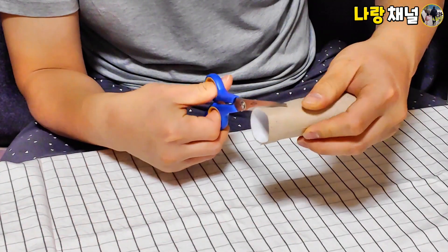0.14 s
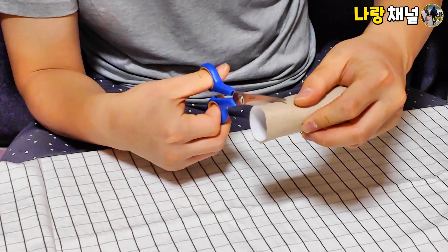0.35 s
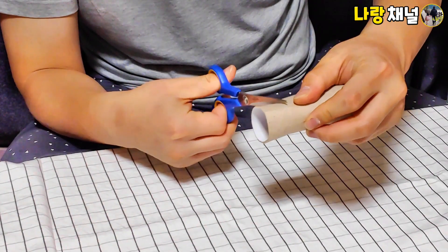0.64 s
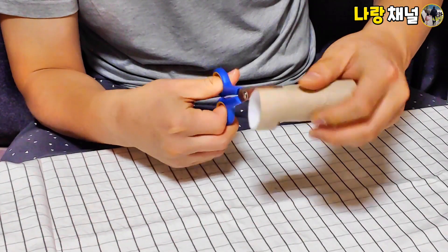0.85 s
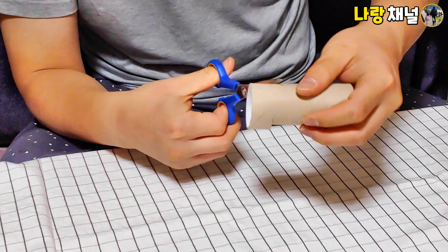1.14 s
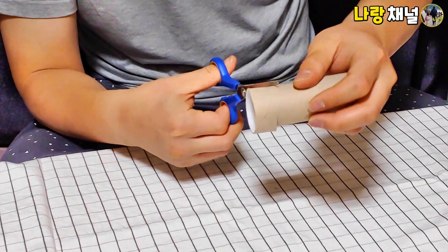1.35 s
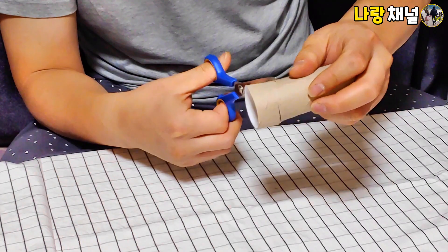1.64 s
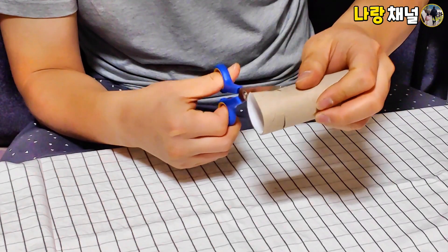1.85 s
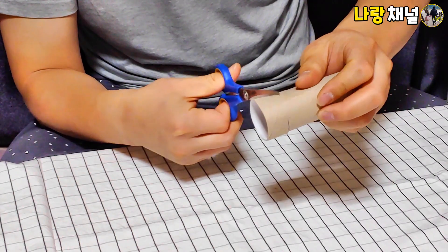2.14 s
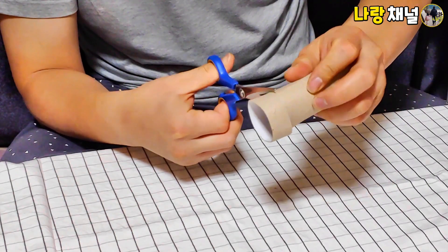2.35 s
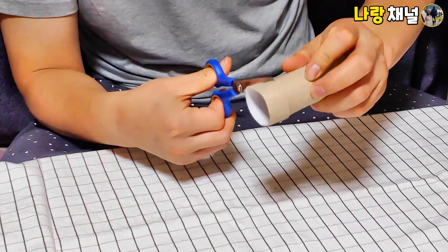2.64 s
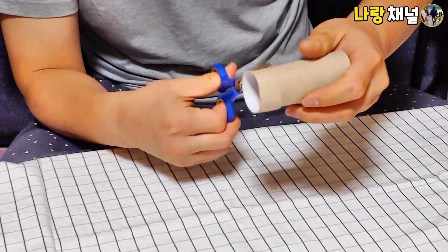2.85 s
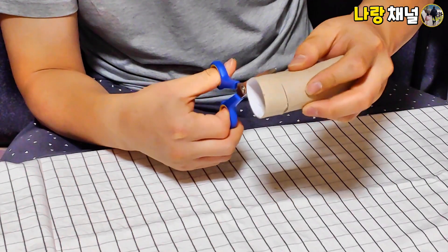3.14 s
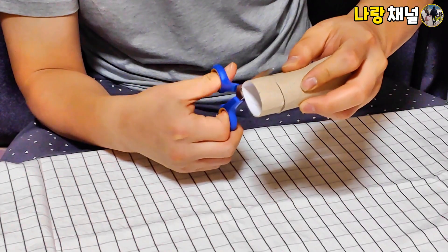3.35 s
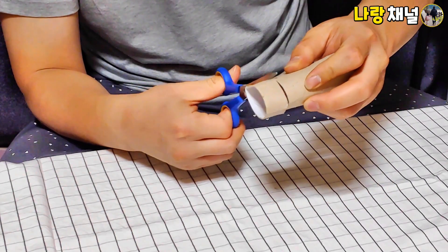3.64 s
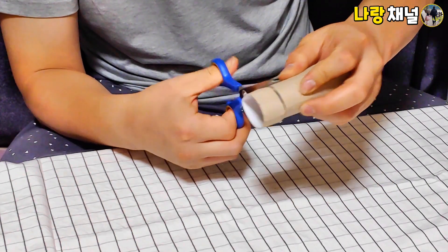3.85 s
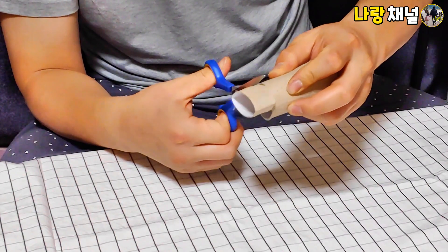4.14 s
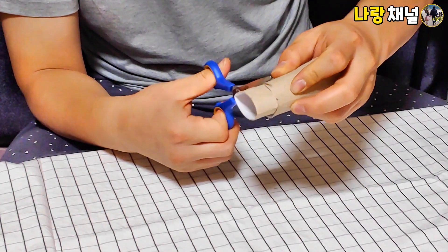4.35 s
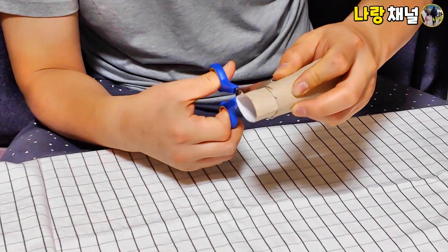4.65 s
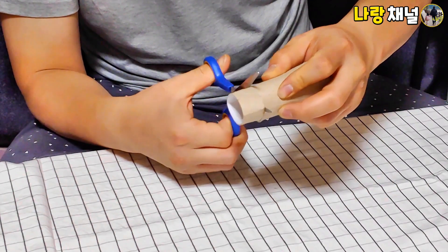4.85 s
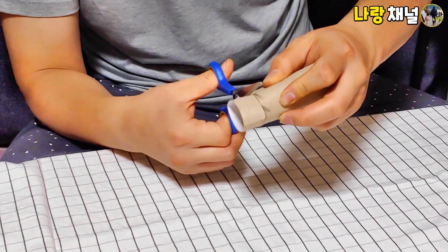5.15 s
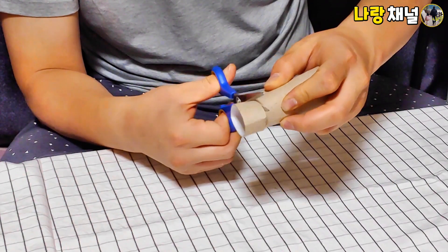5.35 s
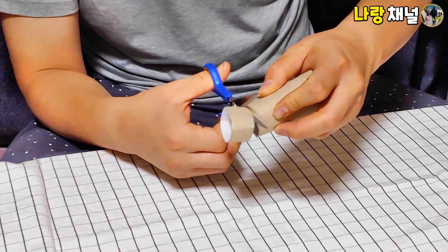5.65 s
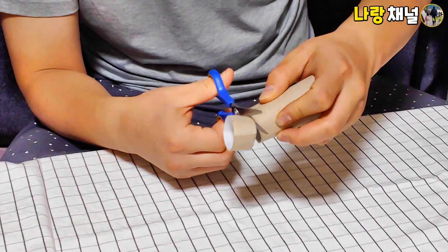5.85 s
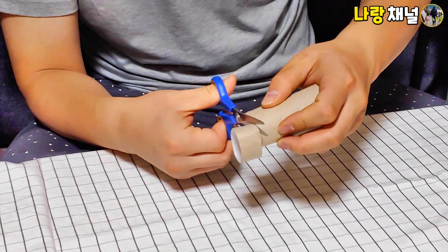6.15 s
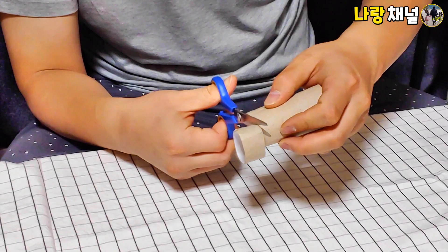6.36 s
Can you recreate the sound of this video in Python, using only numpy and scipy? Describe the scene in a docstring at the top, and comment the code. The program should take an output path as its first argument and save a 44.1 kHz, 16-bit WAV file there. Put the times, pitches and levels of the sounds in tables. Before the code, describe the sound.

Small scissors snip irregularly through a cardboard tube, crunchy papery cuts with hollow snaps, close up in a small quiet room.

```python
"""Small scissors snip round a cardboard tube held over a cloth-covered table in a small room.
From the start, stereo noise, a faint hum and a low rumble, stronger after 4 s, lie below filtered crackle:
the blades shear the card. Snaps soon ring card, fibres, tube air and steel; decaying noise is the room's reply.
Smooth pushes then make a round pop and dull thuds, and noise bursts short pitched rings and hisses; more follow.
Near the end a long noise burst through two low resonances gives a soft rustle."""
import sys
import numpy as np
from scipy import signal
from scipy.io import wavfile

SR = 44100
rng = np.random.default_rng(int(sys.argv[2]) if len(sys.argv) > 2 else 0)


def materialize(psi):
    """Save the field psi as 16-bit PCM at rate SR to the path in sys.argv[1].

    A 1-D psi becomes a single channel; in a 2-D psi each row is a channel.
    """
    bounded = np.clip(np.atleast_2d(psi).T, -1, 1)
    quanta = np.round(bounded * 32767).astype(np.int16)
    wavfile.write(sys.argv[1], SR, quanta)


N = 286648

# Background noise density: f/Hz, relative level/dB per Hz
AIR_SPECTRUM = [(15, -31), (25, -1.5), (64, 3), (242, -6.5), (301, -7), (363, -5.5), (463, -10),
                (1020, -14), (1440, -19.5), (2480, -24.5), (6560, -31), (11600, -40), (16000, -36)]
# Left-right likeness of that noise: f/Hz, correlation/1
AIR_LIKENESS = [(60, 0.42), (250, 0.41), (700, 0.11)]
# Course of the low rumble before its flutter: t/s, level/dB
RUMBLE_COURSE = [(2.9, -78.5), (3.5, -69), (4.03, -67), (4.18, -54.5), (4.41, -49.5), (4.82, -71),
                 (4.91, -52), (4.96, -49), (5.04, -67), (5.14, -48.5), (5.28, -72), (5.9, -59), (5.97, -72),
                 (6.03, -53.5), (6.39, -72), (6.5, -68)]
# Strokes of the blades through and along the card: full force t/s, rise/s, hold/s, tube wall level/dB;
# then re wall: hollow part/dB, air column/dB, low hiss/dB, high hiss/dB, sharp edge of the tearing/dB
STROKES = [(0.0, 0.0088, 0.058, -63.5, 7.5, -2, 5, 6.5, 14),
           (0.11, 0.025, 0.0049, -34.5, -5.5, 2, -35, -20, -6),
           (0.386, 0.03, 0.0066, -39.5, 3.5, 6, -7, -8, 7),
           (0.697, 0.052, 0.068, -55, 4.5, 4.5, -6, -6, -5),
           (0.805, 0.043, 0.026, -47.5, 11, 6.5, 9, 1.5, -3), (0.9, 0.19, 0.036, -48.5, -8, -7, -18, -4, 1),
           (1.049, 0.091, 0.022, -50, -0.5, -15, -10, -4, 1),
           (1.147, 0.088, 0.011, -35.5, -0.5, -5.5, -9, -9.5, -3.5),
           (1.26, 0.11, 0.031, -54, -10, -16, -5.5, -8.5, -4),
           (1.47, 0.082, 0.045, -49.5, -4.5, -2.5, -15, -19, -29),
           (1.706, 0.057, 0.059, -47, -2.5, -3.5, -12.5, -12.5, -13),
           (1.929, 0.19, 0.011, -60.5, -4, -12, -6, -5.5, -6),
           (2.115, 0.025, 0.018, -31.5, -1, 3.5, -18.5, -18.5, 5.5),
           (2.326, 0.057, 0.036, -34, -3, -8, -12, -13.5, -1.5),
           (2.43, 0.03, 0.0085, -45, -10, -21, -14, -14, -5),
           (2.505, 0.034, 0.004, -36, -1.5, -6.5, -15, -15.5, -2),
           (2.772, 0.039, 0.058, -40.5, -7.5, -2.5, -12.5, -13, 1),
           (2.922, 0.093, 0.028, -46.5, -8, -19, -10, -10, -13),
           (2.99, 0.099, 0.027, -53, 5, 5.5, 0.5, 0.5, 11),
           (3.097, 0.1, 0.0082, -36, 0, -1.5, -11.5, -12, -8.5),
           (3.19, 0.073, 0.019, -42, 2, 2.5, -6.5, -8, -1),
           (3.302, 0.032, 0.0039, -42, -9.5, -3.5, -5.5, -7, 2),
           (3.439, 0.063, 0.024, -62, -11, -10, 2.5, 2.5, 2),
           (3.71, 0.037, 0.022, -78.5, 21, 4, -14, -12.5, -4),
           (3.886, 0.025, 0.043, -40, 2, 3, 1.5, -2, 15),
           (4.232, 0.062, 0.01, -57.5, 11.5, 12.5, 4, 5.5, 12),
           (4.337, 0.011, 0.035, -54, 10, 11.5, 1, 5, -3),
           (4.576, 0.033, 0.018, -47, 11.5, 18, -6, -14, -4),
           (4.739, 0.1, 0.076, -66.5, 9, 10, -11, -26, 5), (4.83, 0.069, 0.036, -39.5, -2, 3.5, 4, -3, 14),
           (5.048, 0.068, 0.021, -60, -4, 3.5, 9.5, -1.5, 12.5),
           (5.18, 0.022, 0.018, -56.5, 9, 1, 0.5, -6, 10), (5.239, 0.12, 0.021, -59.5, -12, 18, -2, 0, 16),
           (5.382, 0.026, 0.027, -44, 1.5, 0.5, -4, -10, 4.5),
           (5.621, 0.024, 0.057, -42.5, -6, -4, -5, -6, -10), (5.87, 0.11, 0.025, -55, 5, -1, -3, -2.5, -4),
           (5.939, 0.071, 0.053, -60, 14.5, 10, -5, 5, -9), (6.09, 0.05, 0.05, -63.5, 10, 8, -5, -3, 6)]
# Letting go, fall/(dB/s): wall, hollow part, air column, low hiss, high hiss, sharp edge
FALL_DB_PER_S = (245, 192, 202, 262, 273, 236)
# Snaps and ticks: t/s, drive level/dB; re drive: hollow part/dB, crack/dB, steel ring/dB; crack decay/s
SNIPS = [(0.099, -18.5, -22, -13.5, -22.5, 0.0031), (0.377, -20.5, -31, -12, -20, 0.033),
         (0.691, -21.5, -35, -13.5, -24, 0.012), (0.719, -46.5, -27, 8, -28, 0.0033),
         (0.798, -18, -13, 6, -30, 0.0015), (1.362, -32.5, -27, -21.5, -27, 0.018),
         (1.686, -36, -43, -11, -17, 0.009), (2.104, 1, -25, -22, -26, 0.0038),
         (2.287, -30.5, -21, -25, -10, 0.0066), (2.762, -5.5, -25.5, -18.5, -35.5, 0.0041),
         (2.985, -39, -12, 3, -27, 0.011), (3.299, -22.5, -28.5, -12.5, -21, 0.014),
         (3.433, -58, -10, 2, -21.5, 0.0063), (3.832, -51, -20, -3, -40, 0.0024),
         (3.878, -33, -12.5, -24, -25, 0.005), (4.176, -57.5, -28, 5, -35, 0.0021),
         (4.336, -28, -10.5, 4, -11.5, 0.0047), (4.383, -34.5, -8.5, -7, -15, 0.0046),
         (4.569, -7.5, -18, -19.5, -14.5, 0.0021), (5.159, -36.5, -34, -7.5, -12, 0.013),
         (5.227, -37, -12, -1.5, 3.5, 0.0046), (5.254, -37, -14, -5, 1, 0.0035),
         (5.298, -41, -20, -2, -0.5, 0.0034), (5.378, -19, -24, -4.5, -17, 0.0035),
         (5.441, -32, -16, -8.5, -23, 0.009), (5.606, -26, -23, -22, -14, 0.0045),
         (5.868, -32, -32, -7, -16, 0.0059), (5.924, -22.5, -30, -12, -14, 0.0074),
         (5.98, -41, -6.5, 6.5, -29, 0.0024), (6.079, -40.5, -16, 2, -35.5, 0.0083),
         (6.208, -42.5, -17, 5.5, -30, 0.0019), (6.348, -53.5, -15, 1, -19, 0.0045)]
# Resonances of tube wall, air column, hollow part, low and high fibre hiss, and steel:
# f/Hz, width/Hz, relative level/dB
TUBE_MODES = [(1398, 132, 8), (1605, 138, -1), (1713, 104, -3), (1965, 110, -7.5), (2765, 135, -4),
              (2110, 1700, -11)]
COLUMN_MODES = [(990, 44, -5.5), (1083, 26.4, -3), (1130, 38, -5), (1195, 22, 4)]
HOLLOW_MODES = [(391, 120, 0.5), (474, 209, 3), (611.3, 72.4, 6), (853, 212, -1)]
LOW_FIBRE_MODES = [(3580, 720, 5.5), (3880, 380, 6), (4540, 1930, 2), (5160, 235, 3.5), (5790, 71, 4),
                   (3930, 6600, -3.5)]
FIBRE_MODES = [(6524, 530, 18.5), (6200, 60, -0.5), (7860, 200, 9), (8510, 450, 5), (7500, 3700, -1)]
STEEL_MODES = [(1119, 23, 7.5), (1134, 9.8, 10), (2650, 7.8, -15.5), (4970, 110, -17.5)]
# How the scene faces the microphones: f/Hz, left minus right level/dB
SIDES = [(200, -1.5), (500, -3), (1000, -7), (2400, 5.5), (5500, 6.5), (7500, 4), (9500, -39.5), (13000, 1)]
# Decay of the room by 60 dB: f/Hz, decay time/s
ROOM_T60 = [(200, 0.19), (550, 0.15), (1400, 0.14), (4000, 0.11), (10000, 0.099)]
# Round pops of the buckling card: t/s, drive level/dB; their resonance: f/Hz, width/Hz
POPS = [(0.4299, -37), (5.627, -41.5)]
POP_MODE = [(1150, 560)]
# Thuds passed through the hands to the table: t/s, drive level/dB; their resonance: f/Hz, width/Hz, level/dB
THUDS = [(0.803, -36), (2.103, -45.5), (2.442, -43), (2.762, -48.5), (5.444, -39.5), (5.982, -37)]
THUD_MODES = [(219.4, 14, 0)]
# Short pitched rings and hisses of blades and tube: t/s, drive level/dB, f/Hz, width/Hz, burst decay/s
RINGS = [(0.813, -41, 4960, 600, 0.043), (2.525, -37, 910, 199.5, 0.018), (4.34, -42, 6440, 70, 0.012),
         (4.574, -41.5, 4530, 900, 0.021), (4.572, -32.5, 1161, 40, 0.039), (5.22, -52, 1140, 40, 0.06),
         (5.871, -50, 1202, 40, 0.044), (4.569, -34.5, 430, 121, 0.023), (4.719, -54, 2780, 90, 0.012),
         (5.662, -49.5, 4240, 250, 0.025), (5.87, -56, 4700, 150, 0.024), (6.078, -54, 4020, 297, 0.017)]
# Soft low rustle: t/s, drive level/dB; its resonances: f/Hz, width/Hz, relative level/dB
RUSTLES = [(6.188, -43)]
RUSTLE_MODES = [(314, 9.7, 0.5), (447, 25, 1.5)]

AIR_DB, HUM_DB, HUM_HZ, RUMBLE_HZ = -61, -70.5, 303.3, 47
RISE_DB = 25   # climb of the force during a rise
SNAP_HZ = 2000   # card cushions a snap, which is dull above this
EDGE_HZ = 2530   # the sharp edge of the tearing lies above this
BITE = 0.097   # build-up time of a rough contact, as a share of its decay time
SWAY = 0.018   # relative pitch shift of the card's resonances as it is squeezed and cut
FLICKER_DB, BALANCE_DB = 3.0, 2.5   # random flicker of each mode's strength, random drift of its left-right balance
ROOM_DB, WALL_ECHO_S = -3.5, 0.02056
MIC_ROLL_HZ, MIC_SHELF_DB, PREAMP_DB, CUTOFF_HZ = 13000, -22, -79, 16360


def from_db(db):
    """Logarithmic level: 20 dB is a factor of ten in amplitude."""
    return 10 ** (np.asarray(db) / 20)


def rms_one(x):
    """Normalisation by the root mean square."""
    return x / np.sqrt(np.mean(x ** 2) + 1e-20)


def at_hz(points, hz):
    """Interpolation of a spectrum on a logarithmic frequency axis."""
    table_hz, values = np.transpose(points)
    return np.interp(np.log(hz), np.log(table_hz), values)


def drift(rate, count):
    """Slow random variation: normal points, rate per second, joined by straight lines."""
    points = rng.standard_normal((count, int(N / SR * rate) + 2))
    return np.array([np.interp(np.arange(N) / SR * rate, np.arange(len(p)), p) for p in points])


def filtered(x, order, hz, kind="low"):
    """Butterworth filtering: a maximally flat passband."""
    return signal.sosfilt(signal.butter(order, hz, kind, fs=SR, output="sos"), x)


def bands():
    """Constant relative bandwidth: half-octave filters with their centres."""
    edges = 22 * np.sqrt(2) ** np.arange(20)
    return [(np.sqrt(lo * hi), signal.butter(2, [lo, hi], "band", fs=SR, output="sos"))
            for lo, hi in zip(edges, edges[1:])]


def body(x, modes, wander=1):
    """Modal superposition: resonators wander in pitch, strength and balance; white noise about keeps its rms."""
    out, power = 0, 0
    block = 1024 if wander else N   # samples between pitch updates
    for k, (hz, width, level_db) in enumerate(modes):
        radius = np.exp(-np.pi * width / SR)
        b = (1 - radius ** 2) / 2 * from_db(level_db)
        balance, bend = wander * drift(8, count=2)
        flicker = wander * drift(30, count=1)[0]
        driven = x * from_db(FLICKER_DB * flicker) + 1e-18
        rung, state = np.zeros(N), np.zeros(2)
        for i in range(0, N, block):
            w = 2 * np.pi * hz * (1 + SWAY * bend[i]) / SR
            poles = [1, -2 * radius * np.cos(w), radius ** 2]
            rung[i:i + block], state = signal.lfilter([b, 0, -b], poles, driven[i:i + block], zi=state)
        tilt = from_db(at_hz(SIDES, hz) / 2 + BALANCE_DB * balance)
        # Each mode radiates from its own spot: paths differ by up to one sample
        later = np.roll(rung, k % 3 - 1)
        out = out + (-1) ** k * np.array([rung * tilt, later / tilt])
        power += b * from_db(level_db)
    return out / np.sqrt(power)


def blows(times, level_db, contact_s, rough=1):
    """Exponentially dying contact force: a noise burst that builds up when rough, one smooth push when not."""
    t, out = np.arange(SR // 4) / SR, np.zeros(N + SR // 4)
    decay_s = np.reshape(contact_s, (-1, 1))
    noise = rng.standard_normal((len(times), len(t)))
    bursts = (rough * noise + 1 - rough) * np.exp(-t / decay_s)
    bursts /= np.sqrt(np.mean(bursts[:, :100] ** 2, axis=1, keepdims=True))
    bursts *= 1 - rough * np.exp(-t / (BITE * decay_s))
    for s, db, burst in zip(times, level_db, bursts):
        start = round(s * SR)
        out[start:start + len(t)] += from_db(db) * burst
    return out[:N]


def air():
    """Partial coherence: shared and opposed noise set the likeness of the channels, more alike in the bass."""
    out, white = 0, rng.standard_normal((2, 2, N))
    for k, (hz, sos) in enumerate(bands()):
        mid, side = signal.sosfilt(sos, white[k % 2])
        alike = at_hz(AIR_LIKENESS, hz)
        stereo = np.sqrt(1 + alike) * mid + np.sqrt(1 - alike) * side * [[1], [-1]]
        out = out + from_db(at_hz(AIR_SPECTRUM, hz)) * stereo
    return from_db(AIR_DB) * rms_one(out)


def hum():
    """Simple harmonic oscillation: a faint steady sine."""
    return from_db(HUM_DB) * np.sin(2 * np.pi * HUM_HZ * np.arange(N) / SR)


def rumble():
    """Frequency and amplitude modulation: a low tone wavers and flutters as it swells and sinks."""
    pitch_hz = RUMBLE_HZ + 4.0 * drift(7.6, count=1)[0]
    tone = np.sqrt(2) * np.sin(2 * np.pi * np.cumsum(pitch_hz) / SR)
    flutter_db = 1.77 * drift(25, count=1)[0]
    course_s, course_db = np.transpose(RUMBLE_COURSE)
    swell_db = np.interp(np.arange(N) / SR, course_s, course_db)
    return tone * from_db(swell_db + flutter_db) * from_db([[-1.0], [1.1]])


def stroke_gains():
    """Power addition of strokes that rise, hold and fall: gain of the wall, then of five parts re wall."""
    t, power = np.arange(0, N + 64, 64) / SR, 1e-12
    for s, rise, hold, wall_db, *parts_db in STROKES:
        climb_db = RISE_DB * np.minimum(t - s, 0) / rise
        fall_db = np.outer(FALL_DB_PER_S, np.maximum(t - s - hold, 0))
        levels_db = wall_db + np.array([0, *parts_db])[:, None]
        power = power + from_db(levels_db + climb_db - fall_db) ** 2
    wall, *parts = [np.interp(np.arange(N) / SR, t, gain) for gain in np.sqrt(power)]
    return [wall] + [part / wall for part in parts]


def crackle(per_s, spread_db):
    """Random impulse process: fibres part in clicks of uneven size, scaled to rms 1."""
    sizes = from_db(spread_db * np.minimum(rng.exponential(1, N), 4)) * rng.choice([-1, 1], N)
    # The blade sticks and slips, so fibres part in bunches
    clumps = from_db(3 * drift(120, count=1)[0])
    return rms_one(sizes * (rng.random(N) < per_s * clumps / SR))


def scissors():
    """Forced vibration: shear and snaps drive the same card, tube air, fibres and steel."""
    wall, hollow_part, column, low_hiss, high_hiss, edge = stroke_gains()
    tearing = wall * from_db(-6.5) * crackle(per_s=1100.0, spread_db=3.0)
    hissing = wall * from_db(-4.0) * crackle(per_s=2500.0, spread_db=1.0)
    sharp = filtered(tearing, 4, EDGE_HZ, "high")
    blunt = filtered(tearing, 4, EDGE_HZ)

    s, level, hollow, crack, ring, crack_s = np.transpose(SNIPS)
    cracks = blows(s, level + crack - 3, contact_s=crack_s)
    snaps = filtered(blows(s, level - 17, contact_s=0.00035, rough=0.57), 2, SNAP_HZ)
    hollow_push = blows(s, level + hollow + 0.5, contact_s=0.0001, rough=0)
    steel_push = blows(s, level + ring, contact_s=3e-5, rough=0)

    out = body(blunt + edge * sharp + snaps + cracks * from_db(-7.5), TUBE_MODES)
    out += body(tearing * column + snaps * from_db(-9.5), COLUMN_MODES, wander=0.49)
    out += body(tearing * hollow_part + hollow_push, HOLLOW_MODES)
    out += body(hissing * low_hiss + cracks * from_db(-4.0), LOW_FIBRE_MODES)
    out += body(hissing * high_hiss + cracks * from_db(-11.0), FIBRE_MODES)
    out += body(tearing * column * from_db(-34) + steel_push, STEEL_MODES, wander=0)
    return out


def room(x):
    """Reverberation as convolution: a dying noise tail for each channel, with one wall echo standing out."""
    t, tail = np.arange(SR // 2) / SR, 0
    white = rng.standard_normal((2, 2, len(t)))
    for k, (hz, sos) in enumerate(bands()):
        tail = tail + signal.sosfilt(sos, white[k % 2]) * from_db(-60 * t / at_hz(ROOM_T60, hz))
    tail *= 1 - np.exp(-t / 0.0002)   # reflections need time to arrive
    tail *= 1 + 0.58 * np.exp(-((t - WALL_ECHO_S) / 0.0014) ** 2)
    tail *= from_db(ROOM_DB) / np.sqrt(np.sum(tail ** 2, axis=1, keepdims=True))
    return signal.fftconvolve(x[None], tail, axes=1)[:, :N]


def twice_resonant(force, hz, width):
    """Cascaded selectivity: a band-pass reaching width to either side, then a resonator at the same pitch."""
    once = filtered(force + 1e-18, 1, [hz - width, hz + width], "band")
    return body(once, [(hz, width, 0)], wander=0)


def pops():
    """Impulse response of a broad resonance: the card buckles with a round pop."""
    s, level = np.transpose(POPS)
    hz, width = POP_MODE[0][:2]
    return twice_resonant(blows(s, level, contact_s=0.0001, rough=0), hz, width)


def thuds():
    """Low-frequency impact response: smooth pushes excite one narrow low mode."""
    s, level = np.transpose(THUDS)
    return body(blows(s, level - 8.0, contact_s=0.0021, rough=0), THUD_MODES, wander=0)


def rings_and_hisses():
    """Resonant selection from short noise bursts: blades and tube ring or hiss, each at one pitch."""
    out = 0
    for s, level, hz, width, decay_s in RINGS:
        out = out + twice_resonant(blows([s], [level], contact_s=decay_s), hz, width)
    return out


def rustle():
    """Resonance under a long noise force: a soft low rustle lingers."""
    s, level = np.transpose(RUSTLES)
    return body(blows(s, level - 6, contact_s=0.095), RUSTLE_MODES, wander=0)


def scene():
    """Linear superposition of direct sound, its room reply and the background."""
    direct = scissors() + pops() + thuds() + rings_and_hisses() + rustle()
    return air() + hum() + rumble() + direct + room(direct.mean(axis=0))


def record(dry):
    """Band limitation: the microphone shelves down the treble, the preamplifier hisses, the top is cut."""
    dull = signal.sosfilt(signal.cheby2(8, 40, MIC_ROLL_HZ, fs=SR, output="sos"), dry)
    shelved = dull + from_db(MIC_SHELF_DB) * (dry - dull)
    hissy = shelved + from_db(PREAMP_DB) * rng.standard_normal(dry.shape)
    return signal.sosfilt(signal.cheby2(12, 70, CUTOFF_HZ, fs=SR, output="sos"), hissy)


dry = scene()
out = record(dry)
materialize(out)
```